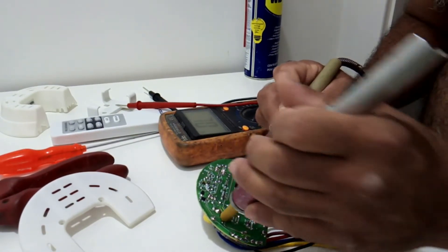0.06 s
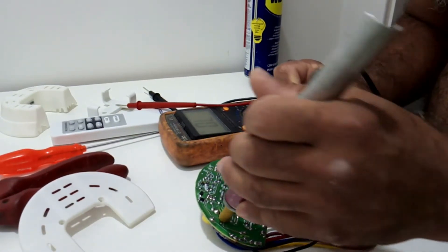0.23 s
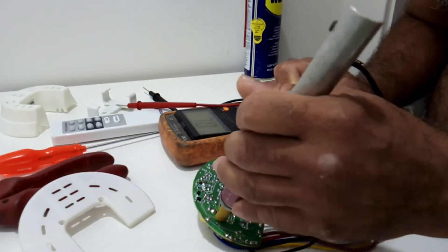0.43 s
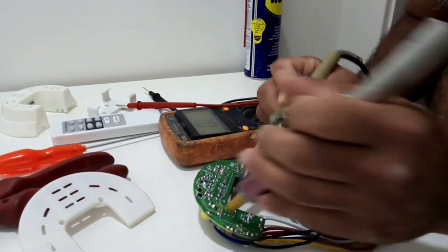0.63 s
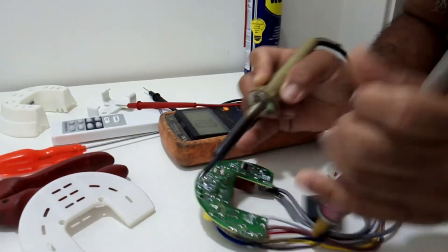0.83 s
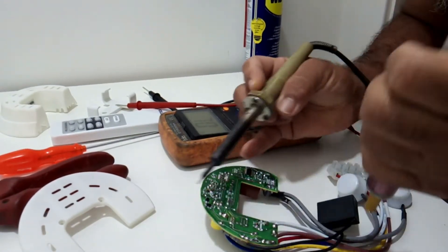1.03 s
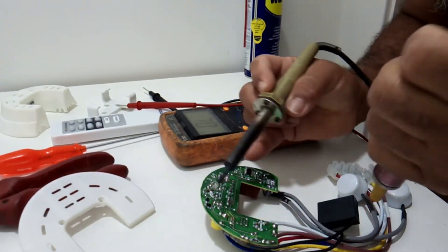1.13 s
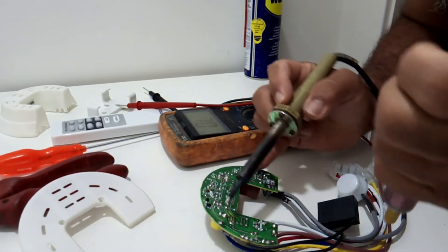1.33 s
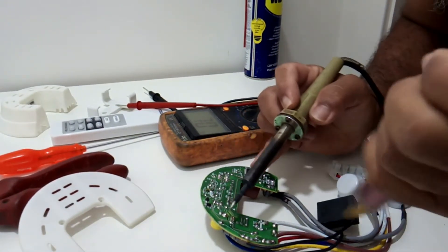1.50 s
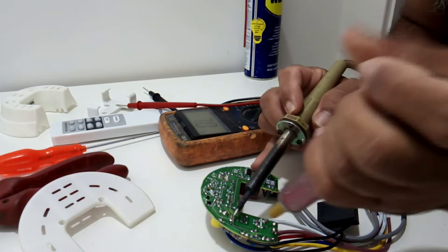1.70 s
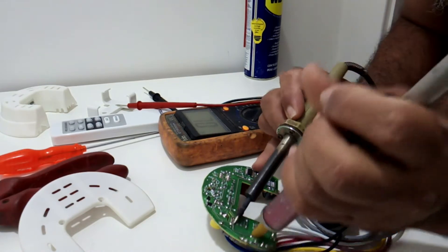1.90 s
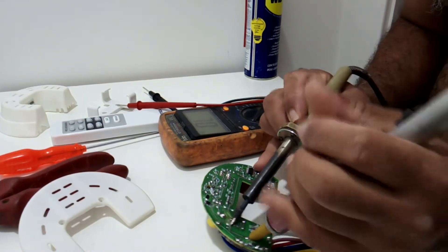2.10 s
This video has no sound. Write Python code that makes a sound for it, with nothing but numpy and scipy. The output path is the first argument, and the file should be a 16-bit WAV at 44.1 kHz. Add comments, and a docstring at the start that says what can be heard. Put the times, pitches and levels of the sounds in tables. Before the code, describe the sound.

A desoldering pump fires with a sharp metallic snap, then clicks twice as it is re-cocked.

```python
"""A spring-loaded desoldering pump at a workbench in a small, quiet room.
The trigger clicks, the piston shoots up the barrel and slams into its stop. A second later the plunger
is pushed down, latches and snaps back. Each hit is a short burst of noise that makes barrel, spring
and room ring. Farther off are dull thuds and slaps, probably steps in loose sandals.
Hands rustle softly over faint room noise, and a low hum swells at the end."""
import sys
import numpy as np
from scipy import signal
from scipy.fft import rfft, irfft, next_fast_len
from scipy.io import wavfile
from scipy.ndimage import map_coordinates

SR = 44100
rng = np.random.default_rng(int(sys.argv[2]) if len(sys.argv) > 2 else 0)


def inscribe(sig):
    """Save sig as 16-bit PCM at rate SR to the path in sys.argv[1].

    A 1-D sig is mono; a 2-D sig holds one channel per row.
    Samples are clipped to [-1, 1] before scaling.
    """
    pcm = np.round(np.clip(np.atleast_2d(sig).T, -1, 1) * 32767)
    wavfile.write(sys.argv[1], SR, pcm.astype(np.int16))


N = 94815
T = np.arange(SR) / SR  # one second of time, for single hits and echoes
SCENE_T = np.arange(N) / SR

# the notes the barrel rings at: pitch_hz, gain_db, ring_s
BARREL_NOTES = [(1750, 4.5, 0.16), (1902, -1, .16), (2480, 0.5, 0.08), (2730, -1, 0.31), (2670, 1, .2),
                (3170, -1.5, 0.46), (3310, 4.5, 0.25), (4270, -4, .3), (4832, 1.5, 0.071),
                (6380, -6.5, 0.18), (14580, -3, .12), (14783, -0.5, 0.13)]


def amp(db):
    """Turn decibels into a number to multiply by."""
    return 10 ** (np.asarray(db) / 20)


def unit_energy(x):
    """Scale a sound so that its squares add up to 1."""
    return x / np.sqrt(np.sum(x ** 2) + 1e-20)


def along(points, hz):
    """Read a table of (pitch_hz, value) between its rows, with octaves evenly spaced."""
    pitches, values = np.transpose(points)
    return np.interp(np.log(hz + 1), np.log(pitches + 1), values)


def fade(ring_s, t=T):
    """A fade that drops 60 dB in ring_s seconds."""
    return np.exp(-np.log(1000) * t / np.maximum(ring_s, 1e-4))


def add(track, start_s, sound):
    """Mix a sound into the track at start_s."""
    part = track[round(start_s * SR):][:len(sound)]
    part += sound[:len(part)]


def colour(tone, size=8192):
    """A filter that makes each pitch as strong as the tone table says."""
    gains = amp(along(tone, np.fft.rfftfreq(size, 1 / SR)))
    cepstrum = irfft(np.log(gains + 1e-6))
    # fold the second half onto the first, so nothing sounds before the hit
    cepstrum[1:size // 2] *= 2
    cepstrum[size // 2 + 1:] = 0
    response = irfft(np.exp(rfft(cepstrum)))
    return unit_energy(response[:size // 2])


def noise(tone):
    """Steady noise shaped by a tone table."""
    response = colour(tone)
    white = rng.standard_normal(N + len(response) - 1)
    return signal.fftconvolve(white, response, "valid")


def ring(notes):
    """A struck object rings at its own notes, each fading at its own speed."""
    return sum(amp(db) * 2 * np.log(1000) / (ring_s * SR) * fade(ring_s) * np.cos(2 * np.pi * hz * T)
               for hz, db, ring_s in notes)


def room_tail(ring_times, build_s=0.0013):
    """The room's echo: noise that builds quickly, then fades at a different speed for each pitch."""
    hz, t, spectrum = signal.stft(rng.standard_normal(SR), SR, nperseg=256)
    spectrum = spectrum * fade(along(ring_times, hz)[:, None], t)
    tail = signal.istft(spectrum, SR, nperseg=256)[1][:SR]
    return unit_energy(tail * (1 - np.exp(-T / build_s)))


def spring(count=130, low_hz=1205, high_hz=7325, ring_s=0.89):
    """The coil's many close notes ring on after a blow."""
    # how strong the coil's notes are: pitch_hz, level_db
    coil_tone = [(1200, -4.5), (2200, 5), (3600, -1), (4500, -8), (6000, -4), (7200, -14)]
    place, phase = rng.random((2, count))
    hz = np.interp(place, (0, 1), (low_hz, high_hz))
    spectrum = np.zeros(SR // 2 + 1, complex)
    spectrum[hz.astype(int)] = amp(along(coil_tone, hz)) * np.exp(2j * np.pi * phase)
    return unit_energy(irfft(spectrum, SR) * fade(ring_s))


def crack(length_s, rise_s=0):
    """One rough hit: a short burst of noise, even across all pitches. Soft hits swell first."""
    swell = 1 - fade(rise_s)
    spectrum = rfft(rng.standard_normal(SR) * fade(length_s) * swell)
    even_burst = irfft(spectrum / (np.abs(spectrum) + 1e-12), SR)
    return unit_energy(even_burst * fade(4 * length_s) * swell)


def contacts(hits, tone, body, room_db, spring_db=-120, rise_s=0):
    """Each hit cracks, echoes and makes the object and room ring; the tone table shapes it all."""
    # low notes of the bench and room: pitch_hz, gain_db, ring_s
    room_notes = [(120, -1.5, 0.44), (197.2, 8, 0.37), (258, -1, 0.14), (328, -3.5, 0.84),
                  (440.5, 0, 0.086), (633, 2.5, 0.21), (728, 6, 0.43)]
    # how long the main echo lasts: pitch_hz, ring_s
    echo_times = [(100, 0.22), (500, .28), (1500, 0.18), (4000, 0.26), (8000, .23), (15000, .2)]
    # how long the faint late echo lasts: pitch_hz, ring_s
    late_times = [(100, .6), (250, 1), (600, 0.49), (2000, .75), (5000, 0.72), (8000, 0.54), (15000, .27)]
    track = np.zeros(N)
    coil = amp(spring_db) * spring()
    for start_s, level_db, length_s in hits:
        burst = crack(length_s, rise_s)
        twang = signal.fftconvolve(burst, coil)[:SR]
        scatter = amp(-1.5) * crack(length_s=0.11)  # off the bench and the nearby wall
        echo = scatter + room_tail(echo_times) + amp(-14) * room_tail(late_times)
        add(track, start_s, amp(level_db) * (burst + twang + amp(room_db) * echo))
    ringing = signal.fftconvolve(track, ring(room_notes) + body)[:N]
    return signal.fftconvolve(track + ringing, colour(tone))[:N]


def pitched(hits, tone, body, room_db, rise_s=0):
    """Hits that each shift the tone table up or down by their own pitch ratio."""
    return sum(contacts([hit], np.multiply(tone, (ratio, 1)), body, room_db, rise_s=rise_s)
               for *hit, ratio in hits)


def rub(levels, tone, grain_db, grain_hz=90):
    """Rubbing noise that follows a loudness curve and catches unevenly."""
    grain = map_coordinates(rng.standard_normal(N // 50), [SCENE_T * grain_hz])
    level_db = np.interp(SCENE_T, *np.transpose(levels), left=-120, right=-120)
    return amp(level_db + grain_db * grain) * noise(tone)


def room_noise(level_db=-75):
    """The faint, steady rumble and hiss of the room."""
    # tone of the quiet room: pitch_hz, level_db
    room_tone = [(15, -34.5), (28, -22), (45, -2.5), (65, -3), (82, -19.5), (117, 1.5), (145, -11.5),
                 (240, -9), (430, -8.5), (600, -17), (1600, -23.5), (4000, -26), (8000, -35),
                 (13500, -37.5), (15200, -31), (16000, -29)]
    return amp(level_db) * noise(room_tone)


def hum(pitch_hz=113.6, level_db=-66, start_s=1.98, rise_s=0.095):
    """A low hum swells at the end."""
    swell = np.clip((SCENE_T - start_s) / rise_s, 0, 1)
    return amp(level_db) * swell * np.sqrt(2) * np.sin(2 * np.pi * pitch_hz * SCENE_T)


def steps():
    """Hollow slaps and thuds and one scuff, probably from loose sandals."""
    # the hollow ring of slaps and thuds: pitch_hz, gain_db, ring_s
    hollow_notes = [(1332, 3.5, 0.43), (1220, 3, 0.12), (1630, -7.5, 0.17), (1880, 5.5, .15)]
    # sharp slaps: start_s, level_db, length_s, pitch_ratio
    slap_hits = [(.854, -20, 0.019, 0.93), (.8575, -20.5, .02, 0.83), (.885, -25, 0.053, 0.84),
                 (1.4785, -15, 0.034, 0.82), (1.931, -19, 0.024, 0.93), (1.943, -21.5, 0.012, 0.98),
                 (1.98, -27.5, 0.082, 0.98), (2.003, -28, 0.13, 0.9), (2.132, -42, 0.081, 0.78)]
    # their tone: pitch_hz, level_db
    slap_tone = [(60, -46), (200, -13.5), (400, -4.5), (750, -4), (1250, 0), (2000, 1.5), (2700, -5.5),
                 (3300, -18.5), (4200, -24), (6000, -35), (10000, -54.5), (16000, -74.5)]
    # dull thuds: start_s, level_db, length_s
    thud_hits = [(.453, -32, 0.021), (.689, -28, 0.052), (.759, -25, 0.032), (1.709, -30.5, 0.052),
                 (1.766, -22.5, 0.037)]
    # their tone: pitch_hz, level_db
    thud_tone = [(35, -46), (70, -21.5), (120, -5.5), (170, -18.5), (255, 3.5), (330, -6.5), (600, -9),
                 (1050, -8.5), (1280, -1.5), (1500, -12.5), (2200, -14.5), (3500, -25), (6000, -38),
                 (10000, -64), (16000, -72)]
    # loudness of the dull scuff: time_s, level_db
    scuff_levels = [(.68, -60), (.693, -55.5), (.735, -47), (.765, -54.5), (.8, -64), (.85, -59)]
    # its tone: pitch_hz, level_db
    scuff_tone = [(40, -35), (120, -4), (170, -18), (260, 5), (330, -2), (650, -1.5), (1000, -8),
                  (1260, -12.5), (2000, -10.5), (3500, -22.5), (5000, -33.5), (6300, -31.5), (8000, -54),
                  (16000, -55.5)]
    hollow = ring(hollow_notes)
    slaps = pitched(slap_hits, slap_tone, hollow, room_db=-0.5, rise_s=0.021)
    thuds = contacts(thud_hits, thud_tone, hollow, room_db=2, rise_s=0.012)
    return slaps + thuds + rub(scuff_levels, scuff_tone, grain_db=0.5)


def handling():
    """Hands and arms shift between the actions, with light ticks and a soft rustle."""
    # light ticks: start_s, level_db, length_s, pitch_ratio
    tick_hits = [(.646, -36.5, .05, 0.7), (.695, -37, 0.06, 1), (1.693, -35.5, 0.014, 0.83),
                 (1.908, -38.5, .07, 1.03)]
    # their tone: pitch_hz, level_db
    tick_tone = [(200, -3), (900, -7.5), (2000, 12.5), (2500, 0.5), (3400, 6), (4400, -12), (9000, -24.5),
                 (16000, -36.5)]
    # loudness of the rustle: time_s, level_db
    rustle_levels = [(.19, -81.5), (.26, -65.5), (.40, -58), (.52, -75), (.61, -65.5), (.8, -68),
                     (.98, -76), (1.05, -92), (1.12, -80), (1.34, -68), (1.62, -84.5), (1.87, -73.5),
                     (2.14, -72)]
    # its tone: pitch_hz, level_db
    rustle_tone = [(40, -17.5), (120, -10), (230, 0), (320, -13.5), (700, -10), (1900, -10), (3000, -21.5),
                   (4700, -27), (6200, -21), (7500, -44), (12000, -50.5)]
    ticks = pitched(tick_hits, tick_tone, body=0, room_db=5)
    return ticks + rub(rustle_levels, rustle_tone, grain_db=0)


def fire_pump():
    """The trigger frees the spring, which shoots the piston up the barrel into its stop."""
    # the trigger clicks, then the piston rattles: start_s, level_db, length_s
    release_hits = [(.2342, -3, 0.031), (.2385, -11, 0.0078), (.2408, -7.5, 0.0081), (.2455, -5.5, 0.044),
                    (.249, -6, 0.023), (.2543, -2.5, 0.012)]
    # their tone: pitch_hz, level_db
    release_tone = [(30, -29), (60, -9.5), (105, 4), (160, -9), (260, 3), (450, -6.5), (700, -10.5),
                    (1100, -12.5), (1500, -6), (1900, 0.5), (2500, -10.5), (3600, -11), (4900, -1.5),
                    (6600, -4), (7400, -19.5), (13500, -20.5), (15200, -16.5), (16000, -21)]
    # the piston hits its stop and bounces: start_s, level_db, length_s
    stop_hits = [(.2622, -9, 0.0036), (.2634, -6.5, 0.016), (.268, -9, 0.022), (.279, -13.5, .02)]
    # its tone: pitch_hz, level_db
    stop_tone = [(30, -46.5), (70, -21.5), (115, -2.5), (160, -20), (250, 0.5), (310, -15), (450, -10),
                 (850, -22.5), (1400, -12.5), (1850, -3.5), (2600, -16.5), (3800, -8), (4800, -7),
                 (5400, -14.5), (7700, -7.5), (9200, -15), (13700, -13.5), (14900, -12), (16000, -6.5)]
    barrel = ring(BARREL_NOTES)
    release = contacts(release_hits, release_tone, barrel, room_db=-2.5, spring_db=-23.5)
    slam = contacts(stop_hits, stop_tone, barrel, room_db=3, spring_db=-23.5)
    return release + slam


def reload_pump():
    """The plunger rubs down the barrel, the catch snaps in and the plunger springs back."""
    # loudness of the sliding plunger: time_s, level_db
    push_levels = [(1.07, -84), (1.11, -63), (1.152, -55.5), (1.18, -60.5), (1.215, -59), (1.231, -85.5)]
    # its tone: pitch_hz, level_db
    push_tone = [(100, -25), (244, -2), (900, -27), (1500, -11), (2470, -3.5), (3620, -16.5), (6290, -8),
                 (9000, -20), (13500, -31), (15200, -25.5), (16000, -27)]
    # the catch snaps in: start_s, level_db, length_s
    latch_hits = [(1.2201, -6.5, .003), (1.2217, -2, 0.0023), (1.2254, -6, .008)]
    # its tone: pitch_hz, level_db
    latch_tone = [(80, -50), (240, -29), (600, -34.5), (1020, -19.5), (1630, -8), (2150, -4.5), (2550, 2.5),
                  (2950, -16), (3700, -12.5), (4900, -15.5), (5600, -10.5), (6200, -0.5), (6700, -4),
                  (7300, -13), (8500, -12.5), (11300, -17), (13700, -26), (15100, -15), (16000, -21.5)]
    # the plunger springs back: start_s, level_db, length_s
    return_hits = [(1.376, -28, .03), (1.384, -13, .025), (1.3898, -4.5, 0.016), (1.3912, -2, 0.012),
                   (1.3968, -9.5, 0.0036)]
    # its tone: pitch_hz, level_db
    return_tone = [(35, -55.5), (70, -27), (125, -10.5), (200, -3.5), (280, -6), (410, 2), (550, -7.5),
                   (900, -11.5), (1500, -5), (2100, -8.5), (2700, -3.5), (3800, -5), (4450, -21.5),
                   (5300, -3.5), (6600, -4.5), (7600, -21), (8800, -13), (9700, -25.5), (11300, -19),
                   (13800, -22.5), (15400, -7), (16000, -12)]
    barrel = ring(BARREL_NOTES)
    latch = contacts(latch_hits, latch_tone, barrel, room_db=-0.5, spring_db=-25)
    snap_back = contacts(return_hits, return_tone, barrel, room_db=-1.5, spring_db=-24.5)
    return rub(push_levels, push_tone, grain_db=2) + latch + snap_back


def scene():
    """The pump and the quieter sounds around it, in mono."""
    return (fire_pump() + reload_pump() + steps() + handling() + hum() + room_noise())[None]


def record(dry, top_hz=15850, edge_hz=70):
    """Cut away the very highest treble, above top_hz."""
    size = next_fast_len(N + SR // 2)
    hz = np.fft.rfftfreq(size, 1 / SR)
    gain = (1 - np.tanh((hz - top_hz) / (2 * edge_hz))) / 2
    return irfft(rfft(dry, size) * gain, size)[..., :N]


dry = scene()
out = record(dry)
inscribe(out)
```